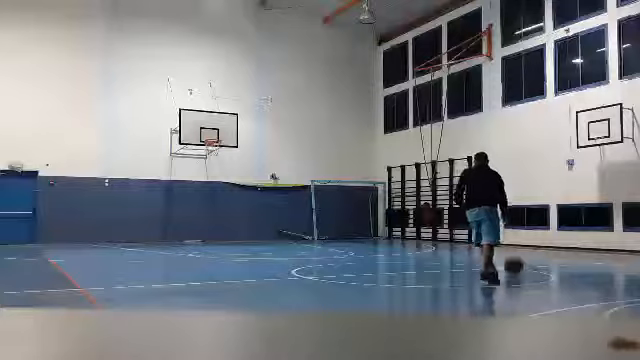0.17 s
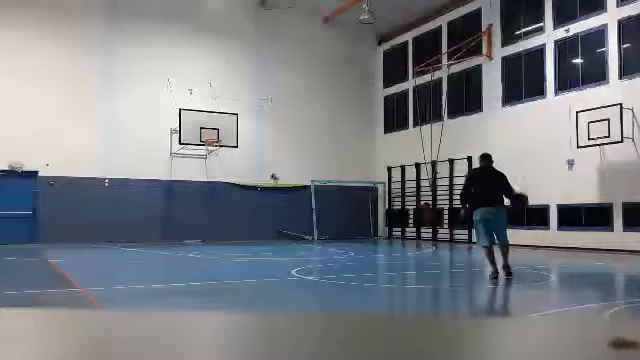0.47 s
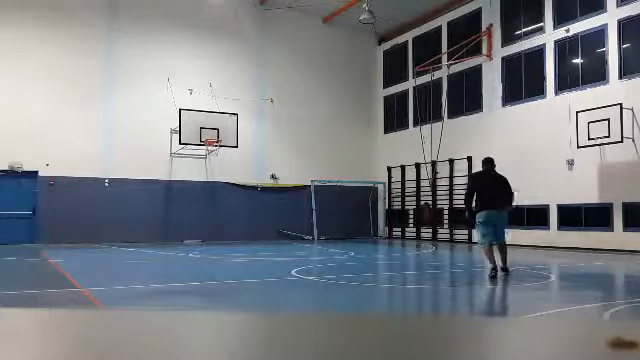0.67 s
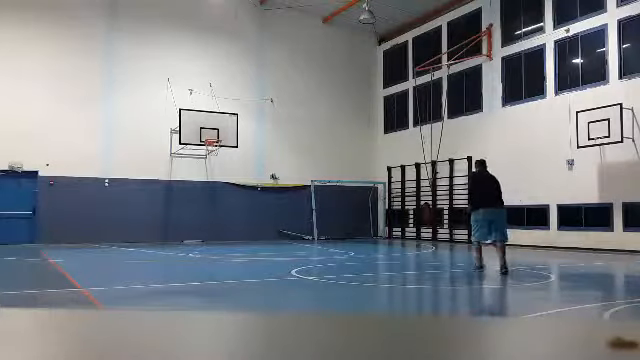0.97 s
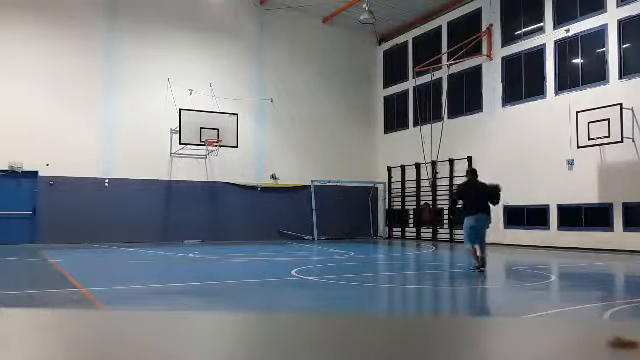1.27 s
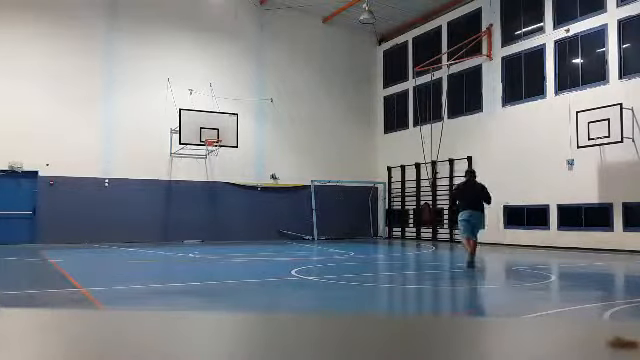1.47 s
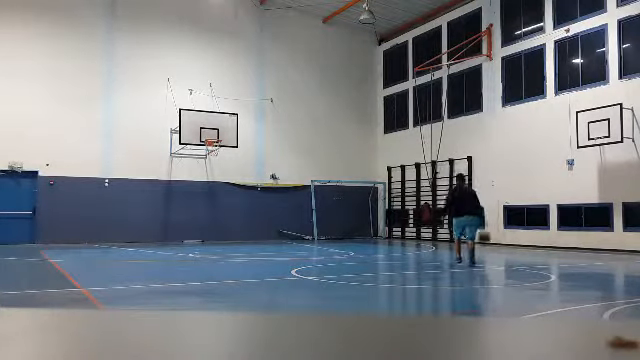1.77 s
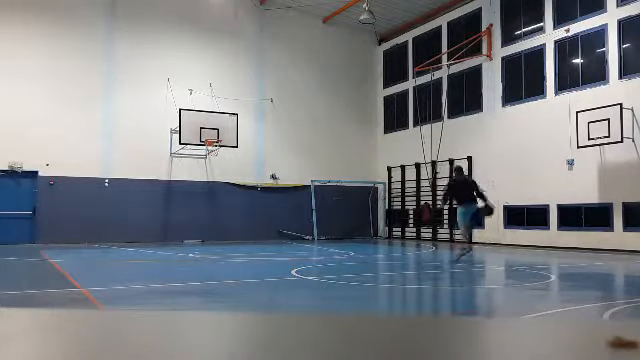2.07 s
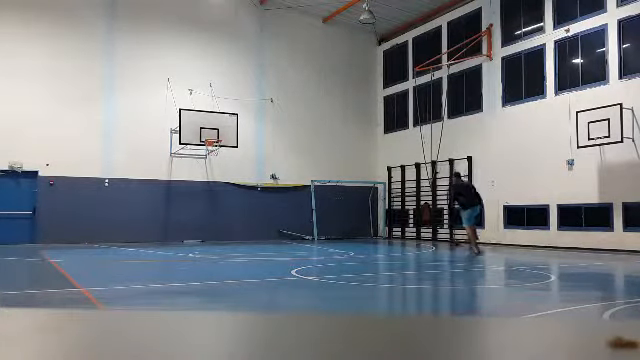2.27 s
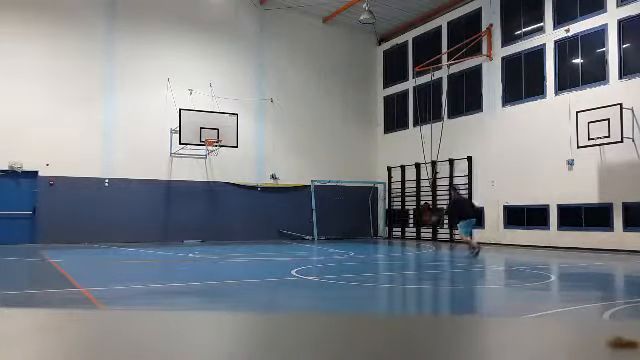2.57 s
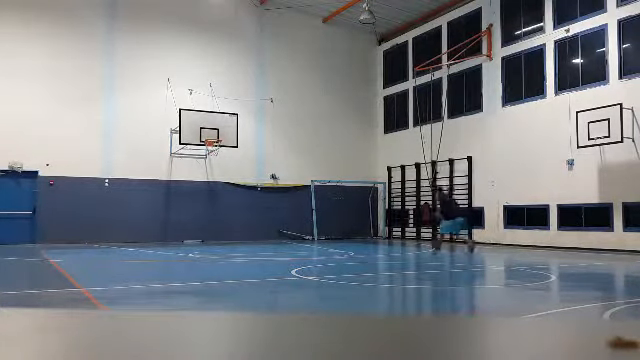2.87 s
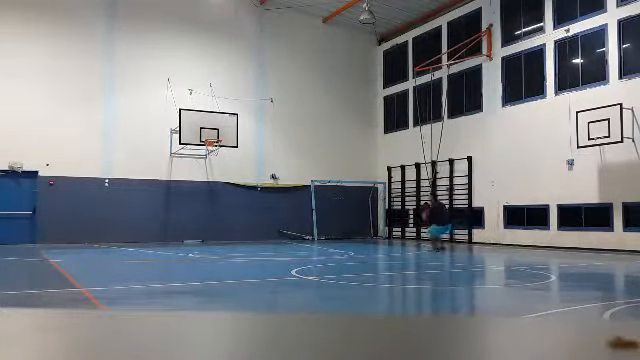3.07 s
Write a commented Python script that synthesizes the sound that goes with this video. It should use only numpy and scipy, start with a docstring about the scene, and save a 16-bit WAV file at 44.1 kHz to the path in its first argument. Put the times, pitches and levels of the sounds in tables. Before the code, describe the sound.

A basketball bounces five times on a hard gym floor, echoing long through the empty hall

```python
"""Basketball in an empty gym

A basketball is dribbled across the floor of an empty, hard-walled gym: five bounces after the tail of an earlier one.
Each bounce sums a filtered-impulse crack with dying sines for floor thump, air ring and skin knocks.
It arrives directly, as single wall echoes, then as a long dense tail of random echoes.
Two microphones of unlike colour hear it; the sound fades in at the start."""
import sys
import numpy as np
from scipy import signal
from scipy.io import wavfile
from scipy.ndimage import uniform_filter1d

SR = 44100
rng = np.random.default_rng(int(sys.argv[2]) if len(sys.argv) > 2 else 0)


def wrap_up_sound(samples):
    """Save the sound to the file named by the first command line argument, as 16-bit audio."""
    columns = np.atleast_2d(samples).T
    # keep every value between -1 and 1, then stretch to whole-number steps
    tamed = np.clip(columns, -1, 1)
    steps = np.round(tamed * 32767).astype(np.int16)
    wavfile.write(sys.argv[1], SR, steps)


N = 141561
LEAD_SAMPLES = 22050  # rendered before time zero, then cut off

# Bounces; the first precedes time zero and leaves only its tail: start_s, crack_db, thump_db, ring_db,
# low_knock_db, high_knock_db, tail_gap_s, thump_tail_db, ring_tail_db, crack_tail_db
BOUNCES = [(-.35, -10, -17, -22, -41, -41, .021, 2, 4.5, 0),
           (0.425, -6, -10, -23.5, -22.5, -19, 0.017, -5, 6.5, -1),
           (1.1518, -8.5, -7.5, -13, -23, -12, 0.015, -5.5, -3.5, -0.5),
           (1.9732, -5, -15.5, -16, -14.5, -15, 0.018, 2, .5, 0.5),
           (2.5, -8, -15.5, -17.5, -23, -32, 0.0076, 1, 4.5, -2),
           (2.947, -9.5, -12.5, -19.5, -29, -18, .016, 1.5, 4.5, 4.5)]
# Direct sound and wall echoes; left_db, right_db weight crack and knocks only:
# arrival_s, left_db, right_db, left_lag_ms, thump_db, ring_db
ARRIVALS = [(0.4243, 3, 1, -0.1, 0, 0), (0.4329, -10, -15, 0.3, -20, 2), (0.4351, -5, -1, 0.7, -2, -6),
            (0.4507, -10, -16, 0, -4, -14), (0.4527, -12, -11, 0.5, -11, -4), (0.4571, -10, -8, 0, 1, -8),
            (0.4592, 0, -2, -0.3, -20, -8), (0.472, -11, 1, -3.1, -4, -1), (0.4974, -14, -7, 0, -20, 0),
            (0.5177, -7, -7, -0.1, -13, -1), (0.5251, -6, -5, 0.4, -20, -4), (0.5598, 1, -4, -0.3, -4, 0),
            (1.1522, 0, -3, -0.1, 0, 0), (1.1627, -5, -1, 0.5, -5, -13), (1.1788, -7, -13, -0.4, 0, -10),
            (1.1834, 2, 0, -0.4, -11, -6), (1.1959, -8, 1, 0.5, -6, -6), (1.2003, -9, -12, 0, -3, -1),
            (1.2107, -12, -3, 0.1, -17, -7), (1.2171, -5, 2, 0.1, -20, -7), (1.271, -2, -4, 0.1, -10, -5),
            (1.9741, 1, -1, -0.1, 0, 0), (1.9844, -5, 1, 0.5, -3, -7), (1.9995, 1, -1, -0.3, -20, -7),
            (2.0069, -8, -5, 0.1, 1, -6), (2.0118, -12, -1, 0.1, -3, -14), (2.0173, -6, -8, -0.1, 0, -7),
            (2.0266, -4, 0, 0.2, -20, -4), (2.0312, -5, -3, 0.1, -5, -6), (2.0355, -7, 3, 0.3, -20, -7),
            (2.0433, -8, -4, -0.1, -20, -8), (2.0532, -2, -4, 0, -17, -3), (2.0897, 0, -4, 0, -2, -7),
            (2.0955, -21, -16, 0, -7, -5), (2.5, 1, -1, -0.1, -7, 0), (2.51, -1, 2, 0.4, -1, -4),
            (2.5226, -4, -8, 0.9, -6, 0), (2.5329, -10, -4, 0.2, 1, -10), (2.5483, -5, -11, 0.1, -20, -1),
            (2.552, -7, 1, 0.1, -10, 0), (2.5636, -5, -7, 0.5, -11, -2), (2.5738, -5, -12, 0, -19, -1),
            (2.5888, -4, -5, -0.3, -20, -6), (2.6152, -3, -22, 0, -20, -2), (2.9471, 3, 0, 0, -4, 0),
            (2.9567, 0, 5, 0.4, -1, -7), (2.9663, 0, -2, -0.2, -3, -5), (2.978, -7, 3, 0.4, -7, -6),
            (2.9918, -4, -5, 0, -20, 0), (3.0083, -7, -1, 0.1, -7, -4), (3.0146, -4, -13, 0, -20, -1),
            (3.0357, -9, -3, 0, 0, -4), (3.0466, -2, -8, 0, -19, -1)]
# Crack spectrum: frequency_hz, level_db
CRACK_SPECTRUM = [(300, -2), (1200, 13), (2500, 12), (3500, 12.5), (5000, 10), (9000, 11), (12000, 5.5),
                  (14400, -8), (15000, -19), (16000, -41)]
# Modes of floor and skin, before detuning: pitch_hz, level_db, t60_s
THUMP_MODES = [(181, -6, 0.034), (260.6, -0.5, 0.032), (431, 1, 0.017), (636, 1, 0.0058)]
# Modes of the air in the ball, before detuning and mode weights: pitch_hz, level_db, t60_s
RING_MODES = [(929, -3, 0.015), (1097, 3, 0.017), (1353, 2.5, 0.016), (1580, -11.5, 0.0087)]
# Low and high skin knock, before detuning: pitch_hz, level_db, t60_s
KNOCK_MODES = [(2600, 0, .005), (5000, -4, .004)]
# Tail decay by band; the top treble is cut short: frequency_hz, t60_s
TAIL_DECAY = [(60, 0.93), (120, 4.5), (250, 7.06), (500, 3.12), (1000, 4.72), (2000, 4.15), (4000, 3.06),
              (7000, 2.15), (9000, 1.43), (10500, 0.76), (12000, 0.2), (15000, .2)]
# Hall tail spectrum: frequency_hz, level_db
HALL_COLOUR = [(40, 14), (100, 4), (200, -2), (330, -1.5), (500, 2), (780, -1), (1100, -0.5), (1800, 2),
               (2600, 1.5), (3500, -1.5), (4500, -1.5), (7000, 1), (10000, -2), (12000, 1.5), (15000, -3)]
# Left-right likeness of the tail: frequency_hz, likeness (1 = same, 0 = independent)
HALL_LIKENESS = [(30, 0.29), (70, .93), (150, 1), (300, 0.8), (600, 0.46), (1100, 0), (15000, 0)]
# Microphone responses: frequency_hz, level_db
MIC_LEFT = [(40, -25.5), (120, 2.5), (250, 1), (2000, -2), (3500, 1.5), (5000, 9.5), (6500, -1.5),
            (10000, -13.5), (12500, -6), (15000, 8)]
MIC_RIGHT = [(40, -32.5), (120, 2), (250, -1), (2000, -3.5), (3500, -2), (5000, 0.5), (7300, 0),
             (10000, -1.5), (15000, 2.5)]

THUMP_RISE_S, RING_RISE_S = .0015, .0003  # time constants
THUMP_LATE_S = .0006  # the floor answers just after the crack
DETUNE_RATIO = .012  # standard deviation per mode and blow
HALL_DB, HALL_KNOCK_DB = 24, -10.5  # whole tail; extra for the knocks, which spread less into the hall
BODY_BUILD_S, CRACK_BUILD_S = .018, .026  # tail build-up time constants
ECHOES_PER_S3 = 2000000  # echo rate grows as time squared
LUMPS_DB, LUMP_S, LUMPS_LAST_S = 2.0, .006, .25  # echo clumps that even out
SPREAD_S = .000105  # pulse spread after 1 s extra travel, growing as its root
SCATTER_DB, SCATTER_T60_S = -23, .02  # noise smear from rough surfaces
SECOND_S, SECOND_DB = .0009, -8  # repeat of each crack arrival by something near the microphones
FADE_START_S, FADE_S, EDGE_HZ = 0.07, 0.018, 15700


def gain_of(db):
    """Convert dB to amplitude gain."""
    return 10 ** (np.asarray(db) / 20)


def read(points, hz):
    """Interpolate a table on a log-frequency axis."""
    table_hz, value = np.transpose(points)
    return np.interp(np.log(hz + 1), np.log(table_hz + 1), value)


def causal(points, size=2048):
    """Minimum-phase filter with the given dB spectrum."""
    hz = abs(np.fft.fftfreq(size, 1 / SR))
    log_gain = read(points, hz) * np.log(10) / 20
    spectrum = np.exp(np.conj(signal.hilbert(log_gain)))
    return np.fft.ifft(spectrum).real[:size // 2]


def echo_taps(size, gap_s, build_s):
    """Random echoes, ever denser, building up after a gap, in clumps that even out."""
    t = np.maximum(np.arange(size) / SR - gap_s, 0)
    share = np.clip(ECHOES_PER_S3 * (t + gap_s) ** 2 / SR, 1e-4, 1)
    present = rng.random((2, size)) < share
    taps = rng.standard_normal((2, size)) * present / np.sqrt(share * SR)  # constant mean power
    lumps = uniform_filter1d(rng.standard_normal(size), round(LUMP_S * SR))
    lumps = lumps * np.sqrt(LUMP_S * SR)
    taps = taps * gain_of(LUMPS_DB * lumps * np.exp(-t / LUMPS_LAST_S))
    return taps * (1 - np.exp(-t / build_s))


def hall_tail(size, gap_s, build_s):
    """Dense echoes, alike in the bass at both microphones; decay set by band, top treble cut short."""
    hz, frame_s, z = signal.stft(echo_taps(size, gap_s, build_s), SR, nperseg=256)
    same = np.clip(read(HALL_LIKENESS, hz), -1, 1)[:, None]
    right = same * z[0] + np.sqrt(1 - same ** 2) * z[1]
    decay = gain_of(-60 * frame_s / read(TAIL_DECAY, hz)[:, None])
    tail = signal.istft(np.array([z[0], right]) * decay, SR, nperseg=256)[1]
    return signal.oaconvolve(tail, causal(HALL_COLOUR)[None], axes=1)


def single_paths(start_s, until_s, size):
    """Pulse trains for crack, thump, ring; later crack arrivals are duller, rough surfaces smear them."""
    cracks, thumps, pings = np.zeros((3, 2, size))
    near = np.arange(-16, 17)
    for at_s, left_db, right_db, lag_ms, thump_db, ring_db in ARRIVALS:
        if start_s - .002 < at_s < until_s - .002:
            channel_s = np.array([at_s + lag_ms / 1000, at_s])
            where = LEAD_SAMPLES + np.round(SR * channel_s).astype(int)
            variance = .25 + (SR * SPREAD_S) ** 2 * abs(at_s - start_s)  # samples squared
            pulse = np.exp(-near ** 2 / variance / 2)
            pulse = pulse / pulse.sum()
            cracks[[[0], [1]], where[:, None] + near] += gain_of([[left_db], [right_db]]) * pulse
            thumps[[0, 1], where] += gain_of(thump_db)
            pings[[0, 1], where] += gain_of(ring_db)
    sample_decay = gain_of(-60 / (SCATTER_T60_S * SR))
    smear = signal.lfilter([gain_of(SCATTER_DB)], [1, -sample_decay], cracks)
    cracks = cracks + gain_of(SECOND_DB) * np.roll(cracks, round(SECOND_S * SR), axis=1)
    return cracks + smear * rng.standard_normal(cracks.shape), thumps, pings


def rings(modes, rise_s, late_s=0, weight=-1, size=4096):
    """Dying sines, detuned per blow; mode k is scaled by weight ** k."""
    t = np.maximum(np.arange(size) / SR - late_s, 0)
    tune = 1 + DETUNE_RATIO * rng.standard_normal(len(modes))
    total = np.zeros(size)
    for k, (hz, db, t60_s) in enumerate(modes):
        decay = gain_of(db - 60 * t / t60_s)
        total += weight ** k * decay * np.sin(2 * np.pi * hz * tune[k] * t)
    return (1 - np.exp(-t / rise_s)) * total


def bounce(crack_db, thump_db, ring_db, low_db, high_db):
    """Impact crack, floor-and-skin thump, air ring and two skin knocks."""
    crack = -gain_of(crack_db) * causal(CRACK_SPECTRUM, size=8192)
    thump = gain_of(thump_db) * rings(THUMP_MODES, THUMP_RISE_S, THUMP_LATE_S)
    ring = gain_of(ring_db) * rings(RING_MODES, RING_RISE_S, weight=0.83)
    low_knock = -gain_of(low_db) * rings(KNOCK_MODES[:1], 1 / SR)
    high_knock = gain_of(high_db) * rings(KNOCK_MODES[1:], 1 / SR)
    return crack, thump, ring, low_knock + high_knock


def scene():
    """Send every bounce along its single paths and through the hall."""
    size = N + LEAD_SAMPLES
    out = np.zeros((2, size))
    ends_s = [row[0] for row in BOUNCES[1:]] + [N / SR]
    for row, until_s in zip(BOUNCES, ends_s):
        start_s, *parts_db, gap_s, thump_tail_db, ring_tail_db, crack_tail_db = row
        crack, thump, ring, knocks = bounce(*parts_db)
        trains = single_paths(start_s, until_s, size)
        for train, part in zip(trains, (crack + knocks, thump, ring)):
            out += signal.oaconvolve(train, part[None], axes=1)[:, :size]
        first = LEAD_SAMPLES + round(start_s * SR)
        body = gain_of(thump_tail_db) * thump + gain_of(ring_tail_db) * ring
        sharp = gain_of(crack_tail_db) * (crack + gain_of(HALL_KNOCK_DB) * knocks)
        # body and crack have independent tails, so they do not cancel
        for part, build_s in (body, BODY_BUILD_S), (sharp, CRACK_BUILD_S):
            echoes = hall_tail(size - first, gap_s, build_s)
            tail = signal.oaconvolve(echoes, part[None], axes=1)
            out[:, first:] += gain_of(HALL_DB) * tail[:, :size - first]
    return out[:, LEAD_SAMPLES:]


def record(dry):
    """Apply each microphone's colour, the fade-in and the band limit."""
    microphones = np.array([causal(MIC_LEFT), causal(MIC_RIGHT)])
    heard = signal.oaconvolve(dry, microphones, axes=1)[:, :N]
    progress = np.clip((np.arange(N) / SR - FADE_START_S) / FADE_S, 0, 1)
    fade = np.sin(np.pi / 2 * progress) ** 2
    low_pass = signal.firwin(511, EDGE_HZ, window=("kaiser", 9), fs=SR)
    return signal.oaconvolve(heard * fade, low_pass[None], "same")


dry = scene()
out = record(dry)
wrap_up_sound(out)
```